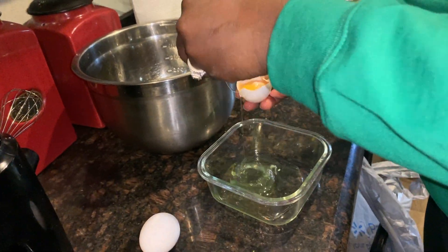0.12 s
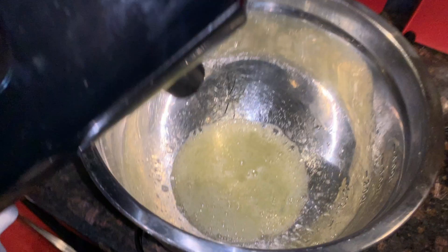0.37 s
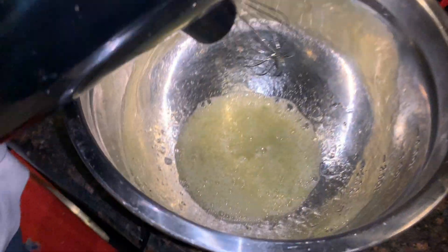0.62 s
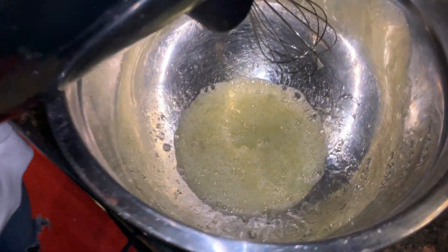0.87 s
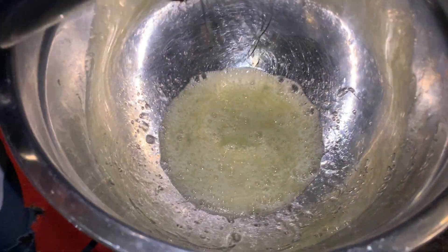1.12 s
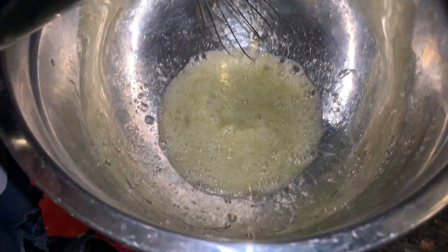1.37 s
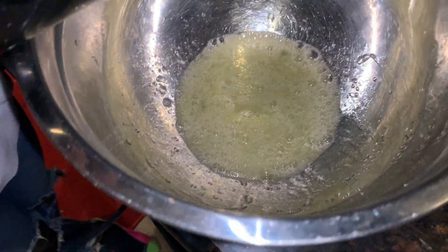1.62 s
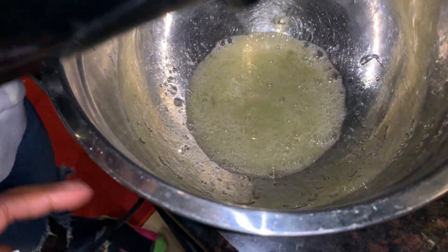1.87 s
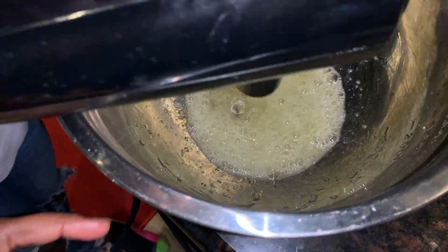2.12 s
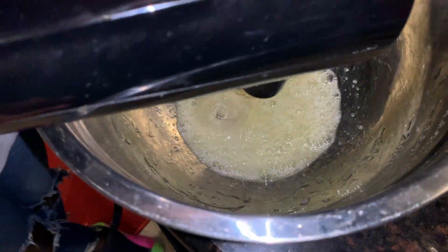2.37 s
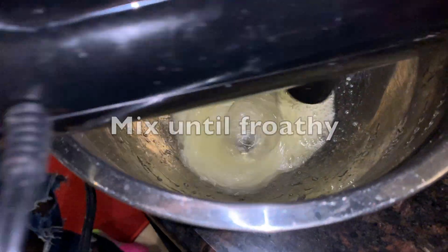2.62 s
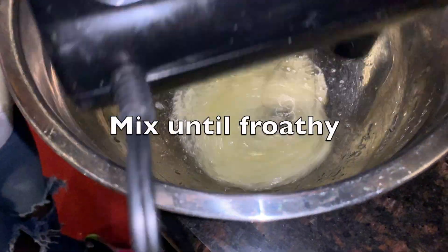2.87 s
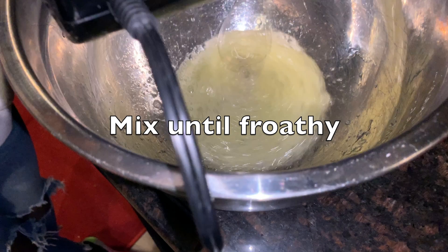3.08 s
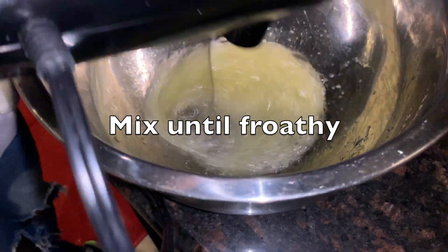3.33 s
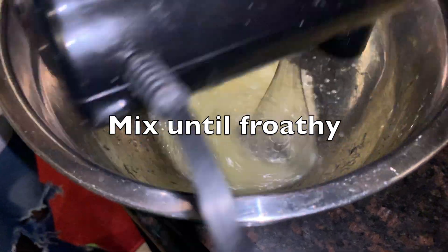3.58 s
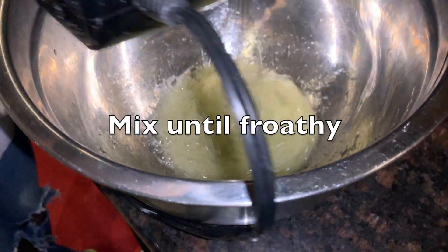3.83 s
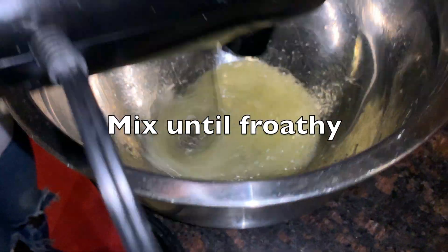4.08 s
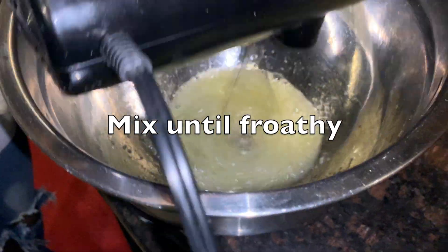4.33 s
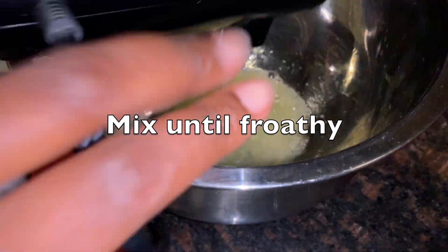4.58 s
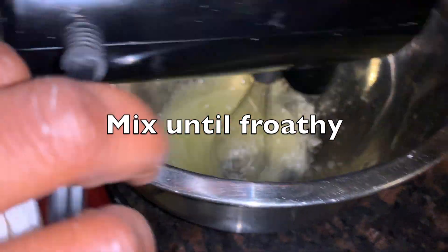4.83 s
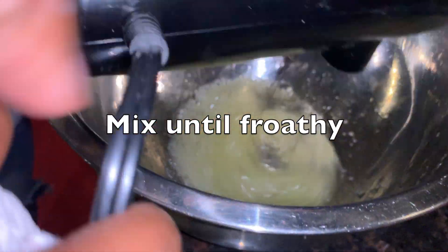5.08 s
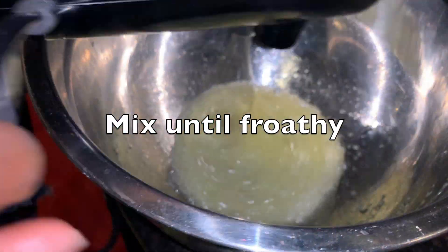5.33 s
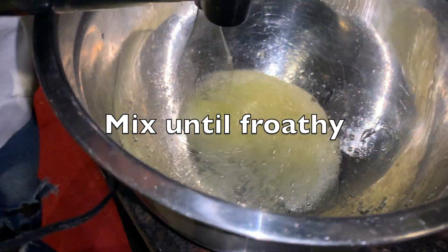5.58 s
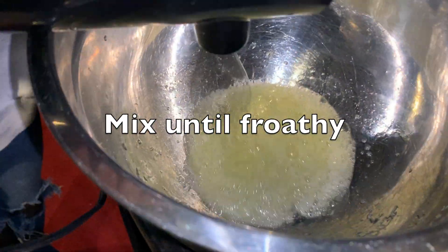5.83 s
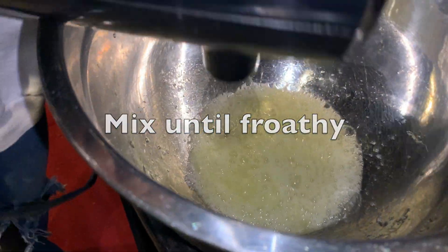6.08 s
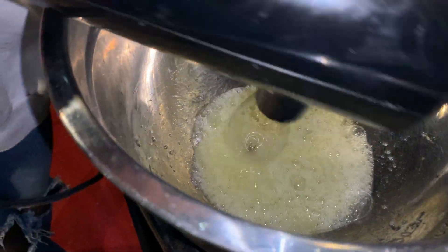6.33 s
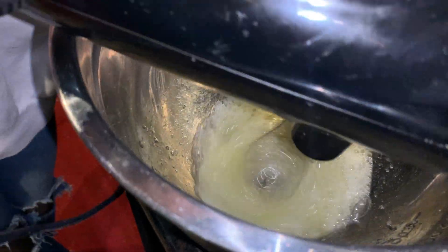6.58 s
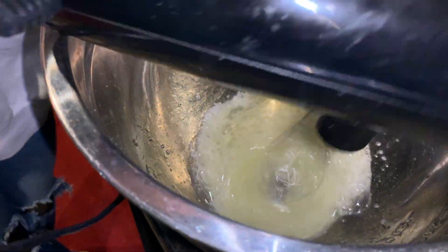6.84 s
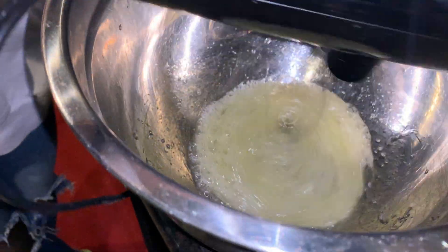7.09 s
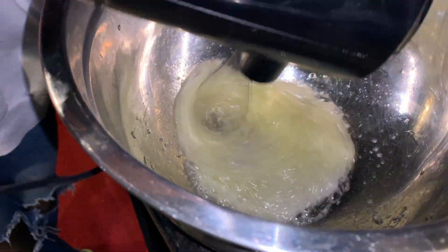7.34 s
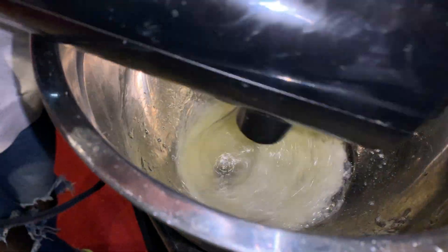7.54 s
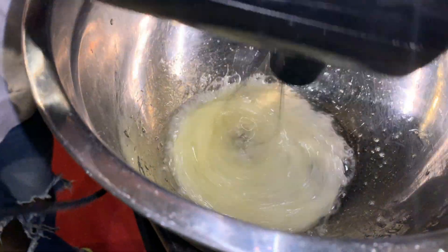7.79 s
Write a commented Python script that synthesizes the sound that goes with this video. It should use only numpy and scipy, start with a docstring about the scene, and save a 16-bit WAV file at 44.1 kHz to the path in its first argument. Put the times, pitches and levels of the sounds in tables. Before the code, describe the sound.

After a brief silence and faint handling ticks, a switch clunks and an electric hand mixer whirs up to a steady roaring whine over a steel bowl.

```python
"""After a short silence, kitchen room tone, small handling ticks and the switch; then a hand-held electric
mixer over a steel bowl runs up to speed. Sines locked to the shaft make its hum and commutator whine;
shaped noise makes the fan and gear roar, coloured by the bowl as the mixer is moved about.
Ticks, knocks and rings are short decaying sines and noise. Two microphone ports hear it all."""
import sys
import numpy as np
from scipy import signal
from scipy.fft import rfft, irfft, next_fast_len
from scipy.io import wavfile
from scipy.ndimage import uniform_filter1d

SR = 44100
rng = np.random.default_rng(int(sys.argv[2]) if len(sys.argv) > 2 else 0)


def materialize(psi):
    """Save the field psi as 16-bit PCM at rate SR to the path in sys.argv[1].

    A 1-D psi becomes a single channel; in a 2-D psi each row is a channel.
    """
    bounded = np.clip(np.atleast_2d(psi).T, -1, 1)
    quanta = np.round(bounded * 32767).astype(np.int16)
    wavfile.write(sys.argv[1], SR, quanta)


def field_ratio(decibels):
    """Amplitude ratio for a level in dB (20 dB per decade); scalars and array-likes work."""
    return 10 ** (np.asarray(decibels, dtype=float) / 20)


N = 350015
TIME = np.arange(N) / SR
PADDED = next_fast_len(N)
SWITCH_S, START_S = 1.387, 1.48  # the switch clicks; the motor becomes audible
MAINS_HZ = 60

# The mixer moves about at speed. Each row: time in seconds, balance of the two lower bowl rings 0-1
# (1: lowest ring loud, middle ring weak; 0: the reverse), strength of the high ring 0-1,
# shaft hum in dB and roar in dB, both at full speed.
MOVES = [(2.1, 0.73, 0, -45, -21), (2.27, 1., 0.96, -36, -20.5), (2.57, 1, 0.68, -24.5, -20),
         (2.95, 0, 0.5, -25.5, -22), (3.22, 0, 0.34, -40, -23), (3.53, 0.44, 0.46, -26.5, -21.5),
         (3.96, 0.14, 0.47, -32.5, -21.5), (4.33, 0.5, 0.34, -29, -22.5), (4.6, .15, 0.2, -30.5, -23.5),
         (4.9, 0.07, 0.2, -27, -22.5), (5.3, 0.53, 0.5, -28, -23), (5.92, 0.83, .2, -27, -23),
         (6.27, 0.7, 0.87, -23.5, -21.5), (6.9, 0.9, 0.23, -22.5, -23.5), (7.35, 0.7, 0.84, -30.5, -23),
         (7.5, .7, 0.83, -24, -23.5), (7.75, .7, .7, -24.5, -22), (7.94, 0.77, 0.4, -31, -23.5)]
# Room tone with handling rustle before the switch. Each row: time in seconds, mean level in dB.
RUSTLE = [(.355, -71.5), (.6, -71), (.8, -70.5), (1.15, -61.5), (1.32, -66)]


def evened(x):
    """Scales to rms 1."""
    return x / np.sqrt(np.mean(x ** 2) + 1e-20)


def read(points, hz):
    """Columns of a table along a log-frequency axis."""
    f, *columns = np.transpose(points)
    return [np.interp(np.log(hz + 1), np.log(f + 1), c) for c in columns]


def along(rows, t=TIME):
    """Columns of a table along time."""
    s, *columns = np.transpose(rows)
    return [np.interp(t, s, c) for c in columns]


def drift(top_hz):
    """Slow random wander of rms 1, drawn at a 32nd of the sample rate."""
    lowpass = signal.butter(2, top_hz, fs=SR / 32, output="sos")
    slow = evened(signal.sosfilt(lowpass, rng.standard_normal(N // 32 + 2)))
    return np.interp(np.arange(N) / 32, np.arange(len(slow)), slow)


def noise_pair(field_db):
    """Two unrelated noises from one field of dB over frequency and time."""
    t, hz = np.arange(N // 128 + 5) * 128 / SR, np.fft.rfftfreq(512, 1 / SR)
    re, im = rng.standard_normal((len(t), len(hz), 2, 2)).T
    spectra = (re + 1j * im) * field_ratio(field_db(hz[:, None], t))
    return signal.istft(spectra, nperseg=512, noverlap=384)[1][:, :N]


def coloured(x, points):
    """Filters by a spectrum and scales to rms 1."""
    gain = field_ratio(read(points, np.fft.rfftfreq(PADDED, 1 / SR))[0])
    return evened(irfft(rfft(x, PADDED) * gain, PADDED)[:, :N])


def room():
    """Room tone and handling rustle as coloured noise, an appliance hum and the slide of a finger."""
    # Spectrum of the room tone. Each row: frequency in Hz, relative level in dB per Hz.
    room_colour = [(18, -33), (30, -13), (76, -6.5), (185, -20), (247, -10), (794, -17.5), (1300, -22.5),
                   (8690, -43), (15000, -57)]
    # An appliance hums. Each row: frequency in Hz, mean level in dB.
    hum = [(253, -73)]
    shake_db, calm_s, calm_db = -41, 2.25, -55  # the start shakes the hand, then it steadies
    rub_s, rub_length_s, rub_db = 0.93, 0.23, -73  # a finger slides
    rub_colour = [(100, -40), (5500, -21), (6300, -6), (7300, -2), (8000, -15), (20000, -38)]  # (Hz, dB)

    before_db = along(RUSTLE)[0] + 3.0 * drift(16)
    shaken_db = shake_db + (calm_db - shake_db) * np.clip((TIME - calm_s) / .15, 0, 1)
    level_db = np.where(TIME < SWITCH_S, before_db, shaken_db + 2.9 * drift(3.2))
    tone = coloured(rng.standard_normal((2, N)), room_colour) * field_ratio(level_db)
    for hz, db in hum:
        level = field_ratio(db + 1.7 * drift(10)) * np.sqrt(2)
        tone += level * np.sin(2 * np.pi * hz * TIME + drift(9.1))
    rub = coloured(rng.standard_normal((2, N)), rub_colour)
    stroke = np.sin(np.pi * np.clip((TIME - rub_s) / rub_length_s, 0, 1))
    fade_in = np.clip((TIME - RUSTLE[0][0]) / 0.011, 0, 1)
    return (tone + rub * stroke * field_ratio(rub_db + 7.2 * drift(30))) * fade_in


def knocks():
    """Dull knocks: each is a short low swing that sags quickly to its pitch while it decays."""
    # Knocks through housing and counter.
    # Each row: start in seconds, level before decay in dB, settled pitch in Hz, t60 in seconds.
    knock_rows = [(.84, -48, 80.5, 0.12), (1.387, -29, 209, 0.13), (1.401, -21, 94, 0.081),
                  (1.449, -25.5, 232, 0.1), (1.514, -28.5, 124, 0.13), (1.6, -48, 56, 0.38),
                  (1.959, -37, 101, 0.23), (2.193, -25.5, 106, 0.14), (2.219, -21.5, 244, 0.18),
                  (3.474, -44, 80, .12), (4.727, -30, 109, 0.082), (5.4, -40.5, 101, .15)]
    out, t = np.zeros(N), np.arange(13000) / SR
    for s, db, hz, t60 in knock_rows:
        swing = np.sin(2 * np.pi * hz * (t + 0.0063 * (1 - np.exp(-t / 0.0017))))
        level = field_ratio(db - 60 * t / max(t60, .02)) * np.minimum(t / 0.0043, 1)
        out[round(s * SR):][:len(t)] += level * swing
    return out


def ticks():
    """Each tick is a fuzzy decaying ring and a broad noise crack with a faint room tail."""
    # Ticks of hand, switch and wire.
    # Each row: start in seconds, nominal level in dB, ring in Hz, nominal crack in dB against the ring.
    tick_rows = [(0.671, -40, 2020, -4), (0.767, -47, 1300, -13), (0.782, -53, 1310, -12),
                 (0.805, -59, 668, -2), (0.84, -46.5, 598, -13), (0.892, -61, 600, -4),
                 (0.93, -56, 501, -9), (0.959, -49, 595, -4.5), (1.048, -59, 503, -12),
                 (1.077, -49.5, 554, -12), (1.117, -47, 6850, -15), (1.228, -49, 6450, -8),
                 (1.386, -41.5, 2730, 9.5), (1.497, -31.5, 980, -10)]
    out, t = np.zeros((2, N)), np.arange(9000) / SR
    for s, db, hz, crack_db in tick_rows:
        fuzz, crack = rng.standard_normal((2, 2, len(t)))
        ring = (1 + 5 * uniform_filter1d(fuzz, 40)) * np.sin(2 * np.pi * hz * t) * field_ratio(-60 * t / 0.032)
        # quick decay plus the room tail
        crack *= field_ratio(crack_db) / 2 * (field_ratio(-60 * t / 0.055) + field_ratio(-11 - 60 * t / 0.38))
        crack = signal.lfilter([1], [1, -.6], crack)
        out[:, round(s * SR):][:, :len(t)] += field_ratio(db) * (ring + crack) * np.minimum(t / 0.00059, 1)
    return out


def long_rings():
    """Modes of the switch and of a wire touching the bowl ring on as fuzzy decaying sines."""
    # Modes set off by the switch. Each row: frequency in Hz, nominal level in dB, t60 in seconds.
    switch_modes = [(1790, -51, 0.75), (2640, -47, 0.36), (3360, -46, 0.25)]
    # A wire touches the bowl. Each row: start in seconds, nominal level in dB.
    whisk_hits = [(3.832, -17.5), (4.338, -20)]
    wire_hz, wire_t60_s = 6350, 0.066
    rings = [(SWITCH_S, *mode) for mode in switch_modes]
    rings += [(s, wire_hz, db, wire_t60_s) for s, db in whisk_hits]
    out, t = np.zeros((2, N)), np.arange(9000) / SR
    for s, hz, db, t60 in rings:
        fuzz = 1 + 6 * uniform_filter1d(rng.standard_normal((2, len(t))), 150)
        level = field_ratio(db - 60 * t / t60) * np.minimum(t / 0.0043, 1)
        out[:, round(s * SR):][:, :len(t)] += level * fuzz * np.sin(2 * np.pi * hz * t)
    return out


def run_up(t=TIME):
    """Share of top speed: a slow exponential lag, held back at first by a short soft start."""
    power_s, lag_s, soft_s, soft_shape = 1.428, .2832, .155, 1.457
    u = np.maximum(t - power_s, .01)  # never quite zero, for the logarithms
    return (1 - np.exp(-u / lag_s)) * (1 - np.exp(-(u / soft_s) ** soft_shape))


def shaft_speed(t=TIME):
    """Turns per second: the top speed times the share reached."""
    # Top speed, sagging a little with the load. Each row: time in seconds, shaft speed in Hz.
    cruise = [(2.2, 372), (2.93, 373), (3.53, 371.5), (4.4, 372.2), (4.87, 370), (5.28, 371.1),
              (5.54, 373.5), (6.13, 374.6), (6.85, 373.8), (7.79, 370.6)]
    return along(cruise, t)[0] * run_up(t)


def bowl_lift(hz, t=TIME):
    """Gain at hz: resonance peaks of the bowl added to 1, following the moves of the mixer."""
    # Rings of the bowl, lowest first. Each row: centre in Hz, width at half lift in Hz.
    bowl = [(1880, 90), (2500, 800), (3320, 405)]
    # Lift of each ring. Each row: added gain in dB where its column of the moves is 0, where it is 1.
    ring_db = [(-27, 14.5), (-1, -25), (-5, 11.5)]
    balance, high = along(MOVES, t)[:2]
    gain = 1
    for (centre, width), (at_0, at_1), share in zip(bowl, ring_db, (balance, balance, high)):
        gain = gain + field_ratio(at_0 + (at_1 - at_0) * share) / (1 + (2 * (hz - centre) / width) ** 2)
    return gain


def roar_field_db(hz, t):
    """Drifting patches of roar, lifted at the rings of the bowl and by the shaking housing."""
    small, large = rng.standard_normal((len(t), len(hz), 2)).T
    small = evened(uniform_filter1d(uniform_filter1d(small, 5, 0), 25, 1))
    large = evened(uniform_filter1d(uniform_filter1d(large, 2, 0), 110, 1))
    patches_db = 0.73 * small + 2.98 * large / (1 + (hz / 7000) ** 2)
    # the housing shakes most while the shaft passes its critical speed
    critical = np.exp(-((shaft_speed(t) - 310) / 55) ** 2)
    shake_db = 7 * critical / (1 + ((hz - 700) / 350) ** 2)
    # the lows are weaker at low speed
    thin_db = 5 * np.minimum(-np.log10(run_up(t)), .6) / (1 + (hz / 1000) ** 4)
    return patches_db + 20 * np.log10(bowl_lift(hz, t)) + shake_db - thin_db


def roar():
    """Fan, brushes and gears: coloured noise that flutters and grows with shaft speed."""
    # Spectrum of the roar. Each row: frequency in Hz, relative level in dB per Hz.
    roar_colour = [(22, -48), (50, -28), (120, -12.5), (190, -9), (260, 1.5), (400, 7.5), (520, -8),
                   (1000, 0), (1600, -1.5), (2600, -0.5), (4000, -3.5), (5500, -3), (7000, -4), (8400, 0.5),
                   (10000, -1.5), (12500, -7.5), (15500, -9.5)]
    growth_db = 36.5  # per tenfold speed
    # a burst of roar as the motor starts; faint hiss sets in before
    surge_s, surge_db, surge_t60_s, hiss_db = 1.545, -26, .25, -52
    flutter_db = 0.53 * drift(12.6) + 0.42 * drift(120)
    u = np.maximum(TIME - surge_s, 0)
    steady = field_ratio(along(MOVES)[3] + growth_db * np.log10(run_up()))
    running = np.hypot(steady, field_ratio(surge_db - 60 * u / surge_t60_s)) * np.minimum(u / 0.018, 1)
    hiss = field_ratio(hiss_db) * np.clip((TIME - START_S) / 0.011, 0, 1)
    noise = noise_pair(roar_field_db) * field_ratio(flutter_db)
    return coloured(noise, roar_colour) * (hiss + running)


def mains_hum():
    """The motor field hums at twice the mains frequency, hardest near stall."""
    eased_db = .5 * np.maximum(55 * np.log10(run_up()), -40)
    return field_ratio(-70.5 - eased_db) * np.cos(2 * np.pi * 2 * MAINS_HZ * TIME)


def main_orders(turn, decades):
    """Shaft orders 1, 2 and 4: wavering sines that grow with speed."""
    # How steeply orders 1, 2 and 4 grow, one value each, in dB per tenfold speed.
    growth_db = [85, 60, 600]
    full_db = along(MOVES)[2], -33, -40  # at full speed
    out = np.zeros(N)
    for k, db, growth, waver_db in zip((1, 2, 4), full_db, growth_db, (1.4, 1.6, 2.6)):
        out += field_ratio(db + growth * decades + waver_db * drift(3)) * np.cos(k * turn)
    return out


def weak_orders(speed, turn, decades):
    """Weaker shaft orders: near sines driven by unbalance and partly lifted by the bowl."""
    # Multiples of the shaft speed, one value for each weak order.
    orders = (1.67, 3, 5, 7, 9, 10, 13, 20, 27)
    # Level of each weak order at full speed in dB, before bowl and shudder.
    orders_db = [-52, -46.5, -42, -49, -46, -48, -47.5, -49, -43]
    shudder_hz, shudder_width_hz, shudder_peak_db = 335, 34, 14
    load_db = 55 * decades  # unbalance forces grow steeply with speed
    shudder_db = shudder_peak_db * np.exp(-((speed - shudder_hz) / shudder_width_hz) ** 2)
    out = np.zeros(N)
    for k, db in zip(orders, orders_db):
        # just under full speed the two lowest weak orders swell
        level_db = db + load_db + (k <= orders[1]) * shudder_db + 1.46 * drift(5)
        out += field_ratio(level_db) * bowl_lift(k * speed) ** 0.67 * np.cos(k * turn + 0.1 * drift(11))
    return out


def whine(speed, turn, decades):
    """Commutator whine: slot multiples of the shaft, blurred in phase, throb with the mains current."""
    # Multiples of the shaft speed, one value for each slot tone.
    slots = (12, 24, 36, 48, 60, 72, 84)
    # Strength of each slot tone at full speed in dB, before the housing.
    slots_db = [-7, -7, -4, -5, -3, -3, -13]
    # The housing passes the whine. Each row: frequency in Hz, gain in dB.
    whine_colour = [(300, -64), (900, -35), (1300, -30), (2000, -31), (2850, -28), (3500, -33), (4300, -37),
                    (5600, -43), (7000, -34), (9000, -34), (12000, -32), (16000, -38)]
    upper_growth_db = 31  # per tenfold speed, for the multiples above the first
    blur_rad = .6  # rms phase wobble
    # the whine is louder while the motor still pulls, until this share of speed is left
    pull_most_db, pull_share = 7, .025
    mains = 2 * np.pi * MAINS_HZ * TIME
    current = evened(1 + 0.08 * np.cos(mains) + 0.55 * np.cos(2 * mains))
    pull_db = pull_most_db * np.minimum((1 - run_up()) / pull_share, 1)
    out = np.zeros(N)
    for k, db in zip(slots, slots_db):
        heard = k * speed < SR / 2.5  # keeps clear of half the sample rate
        level_db = db + read(whine_colour, k * speed)[0] + pull_db
        level_db += (k > slots[0]) * upper_growth_db * decades + 2.87 * drift(26)
        out += heard * current * field_ratio(level_db) * np.cos(k * turn + blur_rad * drift(155))
    return out


def tones():
    """All tones of the motor, locked to the shaft angle except the mains hum."""
    speed, decades = shaft_speed(), np.log10(run_up())
    turn = 2 * np.pi * np.cumsum(speed) / SR  # shaft angle in radians
    out = main_orders(turn, decades) + weak_orders(speed, turn, decades)
    out += whine(speed, turn, decades) + mains_hum()
    # root 2 makes the levels rms
    return np.sqrt(2) * out * np.clip((TIME - START_S) / 0.024, 0, 1)


def scene():
    """Near tones reach both ports alike but shifted in phase; spread sound is only partly shared."""
    # The two microphone ports. Each row: frequency in Hz, left over right in dB, likeness 0-1,
    # lead of the right port in radians.
    ports = [(30, 1, .97, 0), (70, 2, .8, 0), (190, 5, .15, 0), (260, 4.5, .85, 0), (400, 4, .92, 0),
             (1120, 4, .55, -.6), (1500, 3, .55, -.2), (1700, 2, .55, -4.1), (2300, 1, .6, -5.4),
             (2900, 0, .45, -7.6), (3300, -1, .35, -8.2), (3900, -3, .45, -5.9), (4600, -4, .3, -7.1),
             (5400, -6, .45, -9.9), (6400, -1.5, .7, -12.2), (7200, 0, .65, -11.1), (8500, 0, .97, -9.42),
             (11000, 0, .97, -6.28), (13400, 0, .95, -3.14), (15600, 0, .92, 0)]
    hz = np.fft.rfftfreq(PADDED, 1 / SR)
    lean_db, same = read(ports, hz)[:2]
    same = np.clip(same, 0, 1)
    lead = np.exp(1j * np.interp(hz, [p[0] for p in ports], [p[3] for p in ports]))
    near = rfft(tones() + knocks(), PADDED)
    a, b = rfft(roar() + room() + ticks() + long_rings(), PADDED)
    left = near + a
    right = lead * (near + same * a) + np.sqrt(1 - same ** 2) * b
    heard = irfft(np.array([left * field_ratio(lean_db / 2), right * field_ratio(-lean_db / 2)]), PADDED)[:, :N]
    return heard * (TIME > RUSTLE[0][0])  # silence first


def band_limit(x):
    """A steep low-pass at the top of the band."""
    return signal.sosfilt(signal.butter(12, 17070, fs=SR, output="sos"), x)


def record(dry):
    """Limits the band of both ports with a steep lowpass at 15.8 kHz."""
    lowpass = signal.firwin(511, 15800, window=("kaiser", 9), fs=SR)
    mix = signal.oaconvolve(dry, lowpass[None], "same")
    return band_limit(mix)


dry = scene()
out = record(dry)
materialize(out)
```